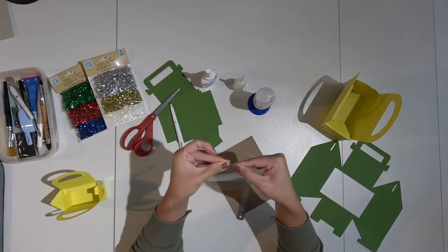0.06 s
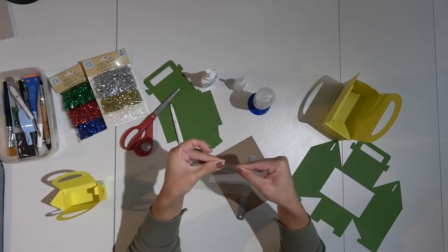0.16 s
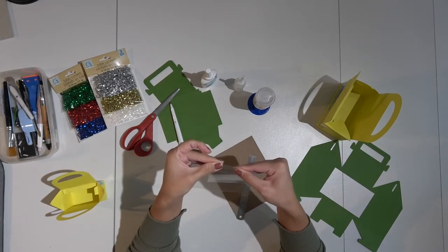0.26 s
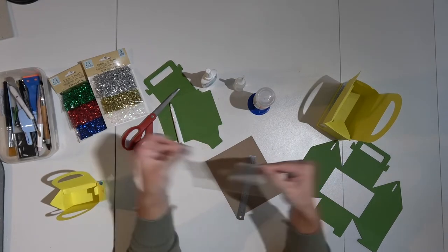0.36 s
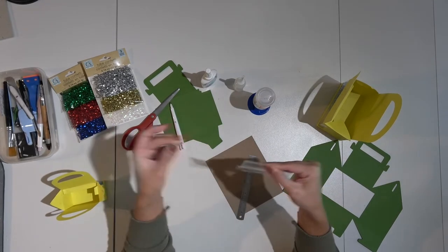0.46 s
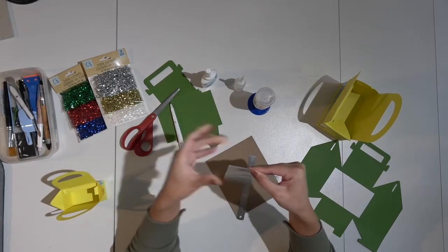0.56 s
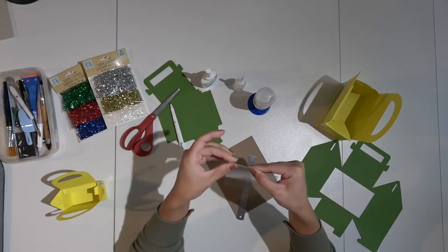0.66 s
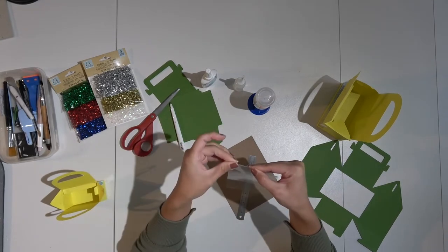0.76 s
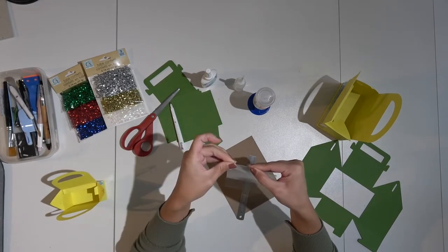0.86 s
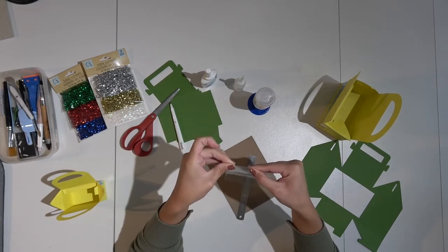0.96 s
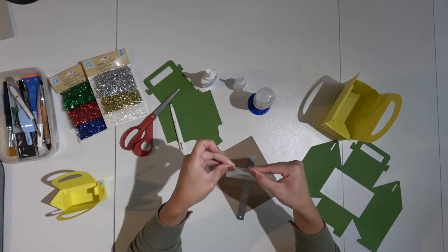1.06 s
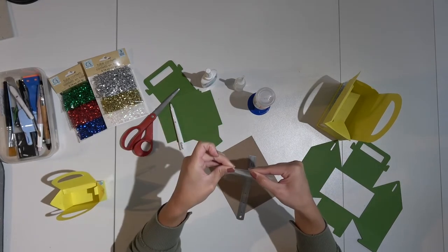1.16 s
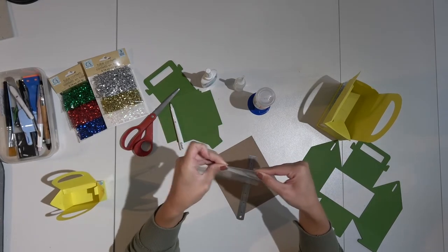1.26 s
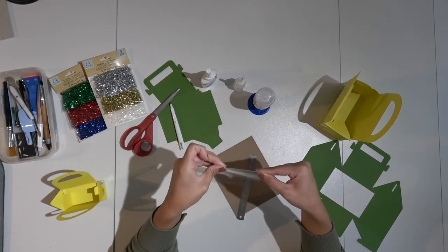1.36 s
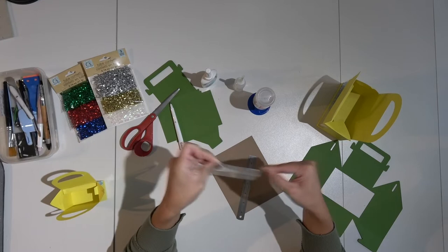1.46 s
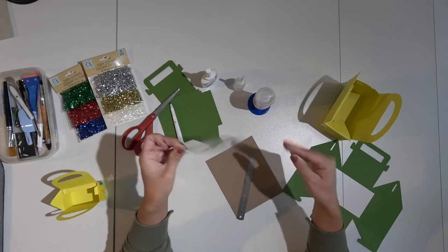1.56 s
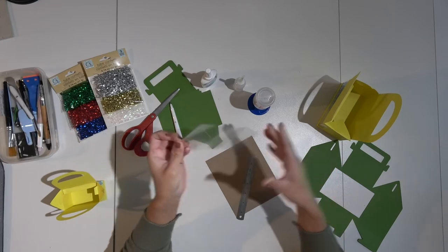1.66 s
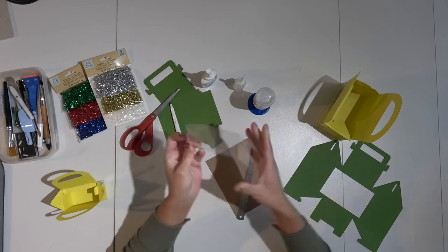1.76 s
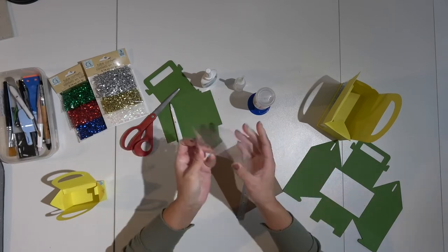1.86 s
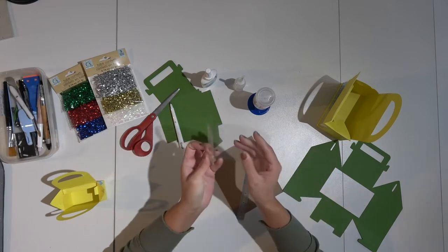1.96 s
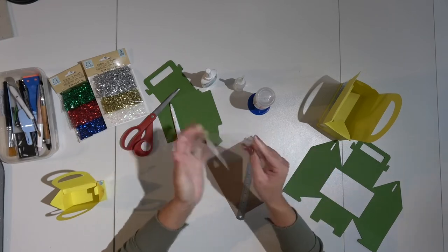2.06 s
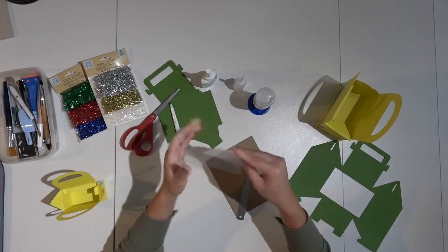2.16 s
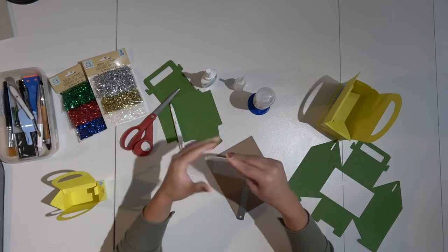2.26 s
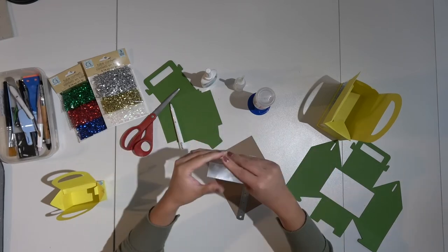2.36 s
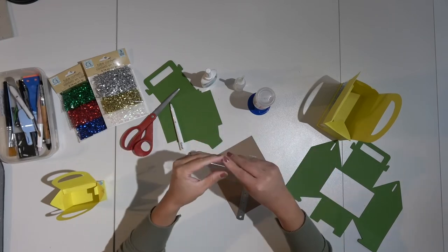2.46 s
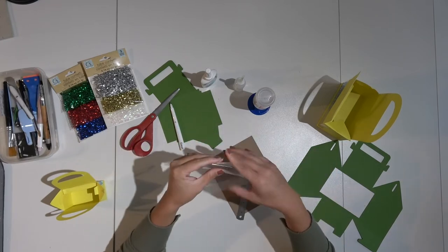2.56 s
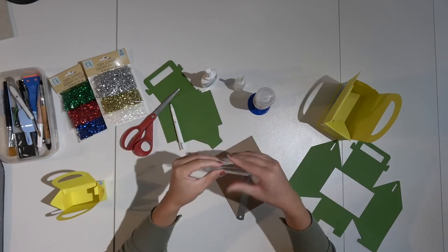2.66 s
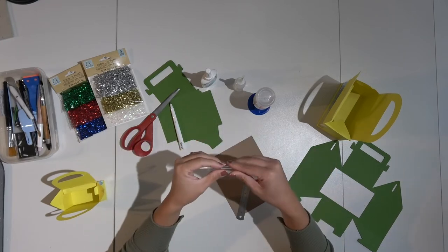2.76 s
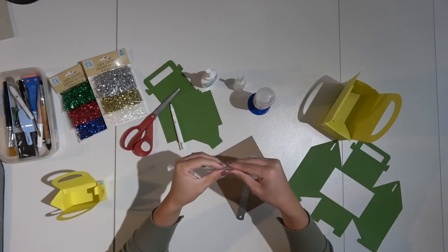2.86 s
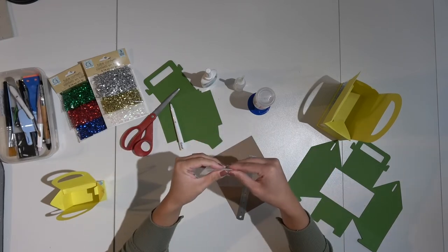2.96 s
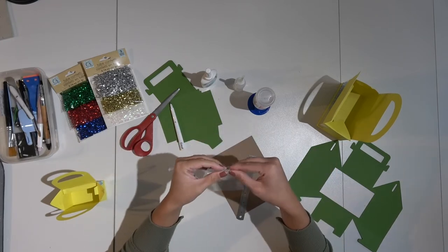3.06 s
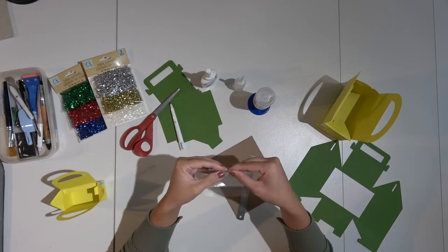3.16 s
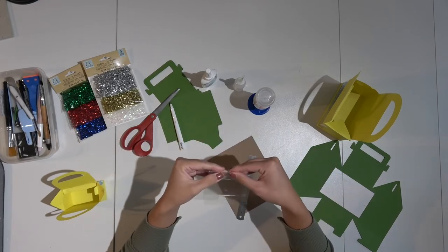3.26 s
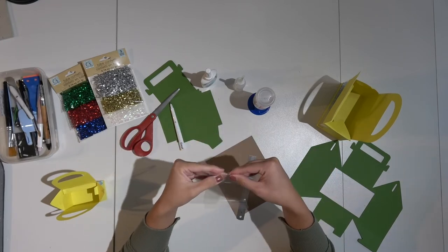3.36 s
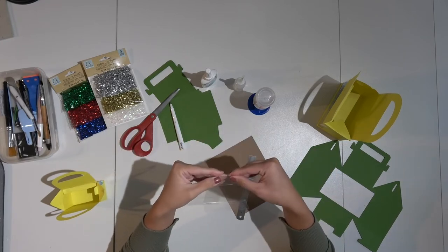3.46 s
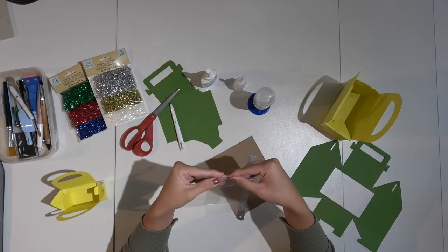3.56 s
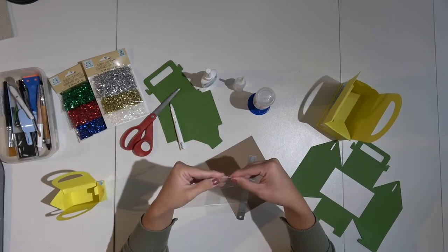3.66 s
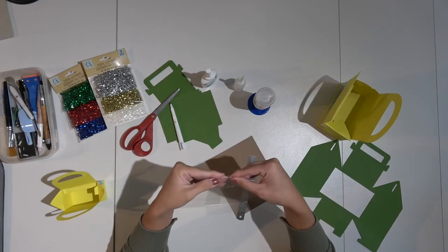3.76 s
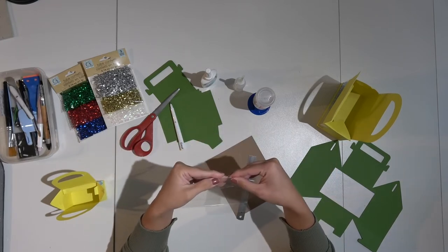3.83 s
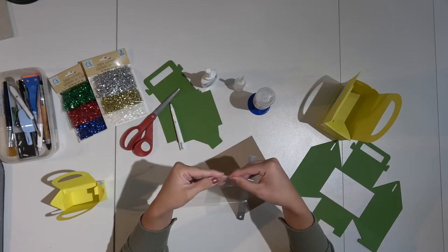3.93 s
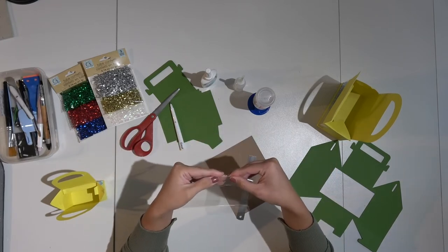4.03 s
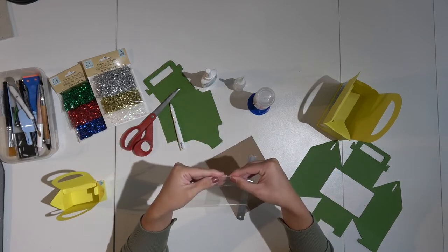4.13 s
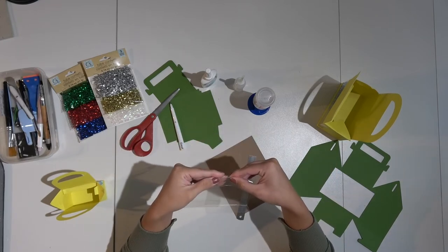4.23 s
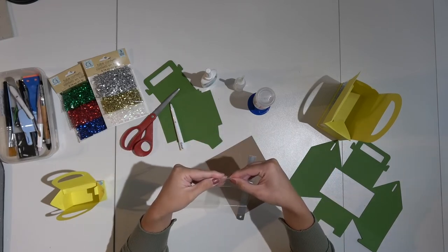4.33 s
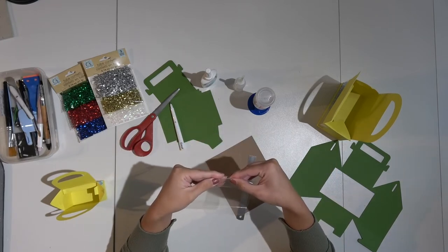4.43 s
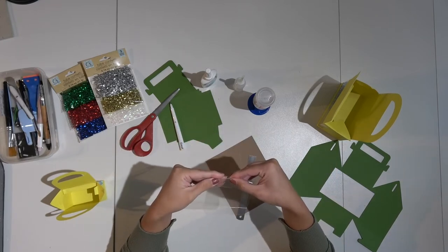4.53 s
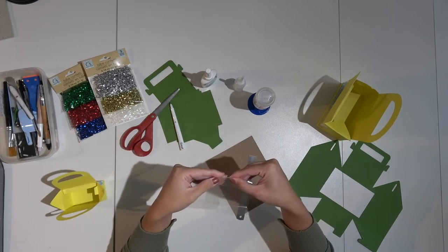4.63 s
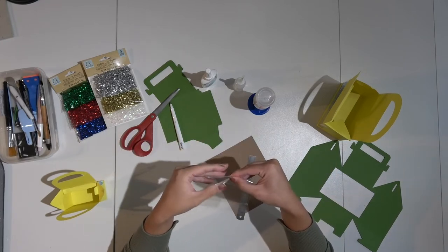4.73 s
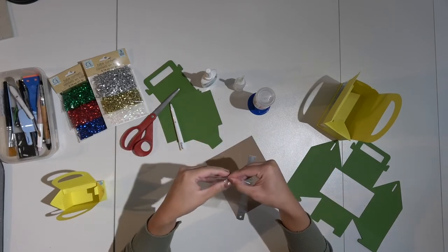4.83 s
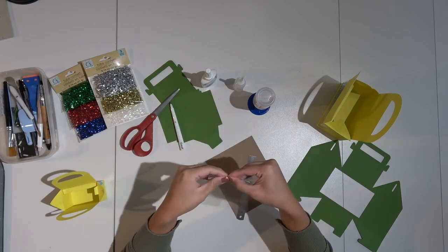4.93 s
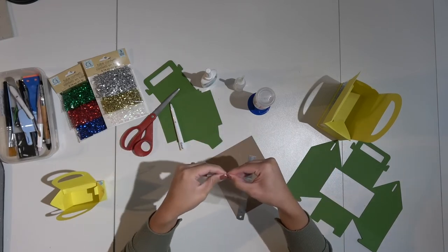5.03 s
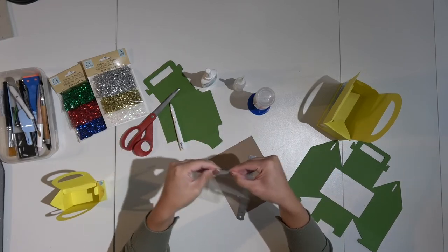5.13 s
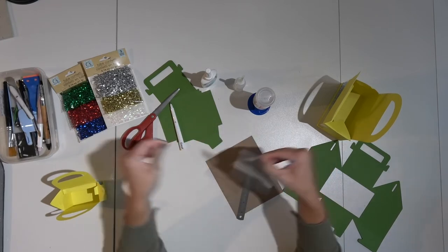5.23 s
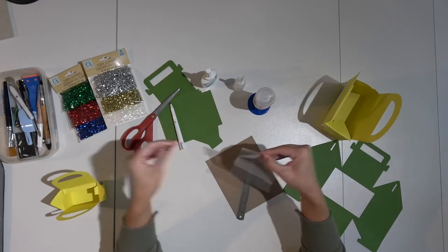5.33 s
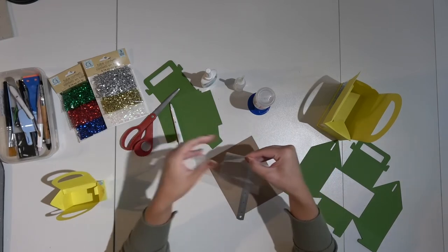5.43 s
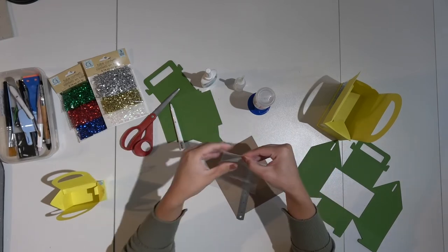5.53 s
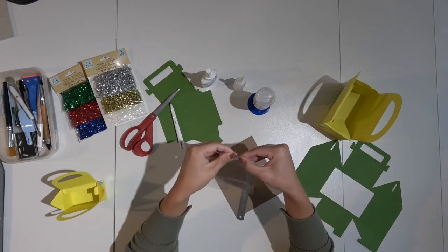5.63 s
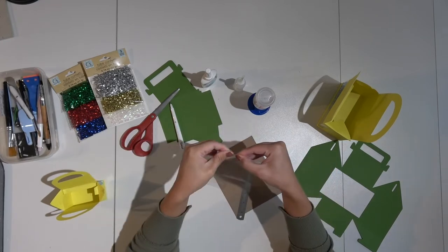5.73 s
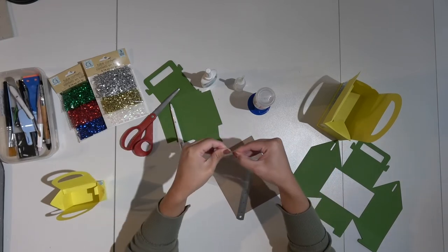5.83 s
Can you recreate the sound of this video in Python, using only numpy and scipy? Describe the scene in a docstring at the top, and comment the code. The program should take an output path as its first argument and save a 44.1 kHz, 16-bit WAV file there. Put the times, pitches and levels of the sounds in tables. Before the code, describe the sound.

A thin, stiff plastic sheet is handled in a small, lively room, with quiet fan rush, low wavering hum and fine microphone hiss throughout. After a faint rub, a bright slip and flapping flick comes at 0.3 s, with tiny ticks near 0.7 s. Dull wobbling starts at 1.1 s, a low crack with a hollow pop at 1.2 s, and a sharp flick at 1.5 s. From 1.7 to 2.1 s snaps, flutters and bright damped pops crowd together; another dense cluster follows at 2.3 to 2.6 s, then duller cracks at 2.7 to 2.9 s. Things calm to a small tick at 3.0 s and barely audible rubbing. A knocky double pop comes at 4.0 s, a crisp high snap at 4.5 s, weak flutter around 4.7 s, and a strong hissing flick with flap at 5.2 s. Soft dull wobbles and a light snap at 5.6 s finish it.

```python
"""Bending a clear plastic sheet

Two hands bend and crease a thin clear plastic sheet over a craft table in a small, live room.
Creases snap as hard kicks to many dense modes, and whole panels pop with one damped note each.
The edge slips hissing from under a fingertip and the freed sheet flaps: clouds of tiny jerks drive the modes.
Echoes and a diffuse tail surround the sheet; behind it a fan hums and rushes and the microphone hisses."""
import sys
import numpy as np
from scipy import signal
from scipy.fft import rfft, irfft, next_fast_len
from scipy.io import wavfile

SR = 44100
rng = np.random.default_rng(int(sys.argv[2]) if len(sys.argv) > 2 else 0)


def master_out(mix):
    """Clip the mix to full scale and print it as 16-bit PCM to the path in sys.argv[1]."""
    frames = np.transpose(np.atleast_2d(mix))
    ceiling = np.clip(frames, -1, 1)
    pcm = np.round(ceiling * 32767).astype(np.int16)
    wavfile.write(sys.argv[1], SR, pcm)


N = 259640  # length in samples

CUTOFF_HZ = 15800  # top of the sheet's modes and of the recorder
MID_HZ = 2300  # pitch at which levels and ring times of the sheet are stated
POP_RING_S, POP_LOW_LINGER = 0.0033, 0.76  # decay at MID_HZ; lower notes last longer by this power
# hissing strokes; the slide before each flick shares their room send
RUB_TILT_DB, RUB_CORNER_HZ, RUB_ROOM_DB = 4, 9200, -3.3


def from_db(db):
    """Decibels to gain."""
    return 10 ** (np.asarray(db) / 20)


def unit_energy(x):
    """Scale so that the squares sum to one."""
    return x / np.sqrt(np.sum(x ** 2) + 1e-30)


def at_hz(points, hz):
    """Read a table of (Hz, value) on a log-frequency axis."""
    points = np.array(points)
    return np.interp(np.log(np.maximum(hz, 1)), np.log(points[:, 0]), points[:, 1])


def add(track, sound, s):
    """Mix a sound into a track from time s on."""
    start = round(s * SR)
    first, last = max(start, 0), min(start + len(sound), N)
    track[first:last] += sound[first - start:last - start]


def sheet_modes(ring_s, low_linger, travel_s, count=110):
    """The sheet's answer to one kick: dense modes, retuned at every bend; low ones ring longer and arrive later."""
    depth = (np.arange(count) + rng.random(count))[:, None] / count
    hz = CUTOFF_HZ * (140 / CUTOFF_HZ) ** (depth * (1 + depth) / 2)
    slowness = MID_HZ / hz
    life_s = ring_s * slowness ** low_linger
    # bending waves run faster at high pitch
    arrival_s = travel_s * np.sqrt(slowness)
    t = np.maximum(np.arange(SR // 40) / SR - arrival_s, 0)
    modes = np.sin(2 * np.pi * hz * t) * np.exp(-t / life_s) / np.sqrt(life_s)
    return unit_energy(rng.choice([-1, 1], count) @ modes)


def tint(x, tilt_db, corner_hz):
    """Colour one bend: taut sheets tilt thin, slack ones full, quick moves reach higher; fine ripple stays."""
    # How well the sheet radiates. Each row: frequency in Hz, gain in dB.
    sheet_radiation = [(100, -27), (175, -20), (250, -5), (400, -4.5), (520, -2), (750, -4.5), (1150, -1),
                       (2100, -0.5), (3200, -2.5), (4100, -2), (5200, -0.5), (10000, -1.5), (13000, -6),
                       (16000, -18)]
    roll_off_order = 6.54
    size = 2 * next_fast_len(len(x) // 2 + SR // 40)
    spectrum, hz = rfft(x, size), np.fft.rfftfreq(size, 1 / SR)

    # energy in a half-octave band sliding around each frequency, stated per octave
    energy_below = np.cumsum(np.abs(spectrum) ** 2) * 2 / size
    centre, step = np.clip(hz, 170, 13000), 2 ** .25
    upper = np.interp(centre * step, hz, energy_below)
    lower = np.interp(centre / step, hz, energy_below)
    per_octave = 2 * (upper - lower)

    held = np.clip(hz, 350, 10000)  # tilt and roll-off stay constant outside this range
    roll_off_db = 10 * np.log10(1 + (held / corner_hz) ** roll_off_order)
    colour_db = tilt_db * np.log2(held / MID_HZ) - roll_off_db
    gain = from_db(colour_db + at_hz(sheet_radiation, hz)) / np.sqrt(per_octave + 1e-12)

    # folding the cepstrum makes the filter causal (minimum-phase)
    cepstrum = irfft(np.log(gain)) * (1 + np.sign(np.fft.fftfreq(size)))
    return irfft(spectrum * np.exp(rfft(cepstrum)))


def radiate(sound, s, level_db, tilt_db, corner_hz, room_db):
    """Colour one sound and place it; rows: straight to the microphone, out into the room."""
    track = np.zeros(N)
    spread_over_10_ms = np.sqrt(SR / 100)
    add(track, from_db(level_db) * spread_over_10_ms * tint(sound, tilt_db, corner_hz), s)
    return np.array([track, from_db(room_db) * track])


def stick_slip(swell_s, fade_s, per_s, spread_db, clump_db=1.5, clumps_per_s=260):
    """A cloud of tiny uneven jerks that clumps, swells and fades; also gives the time to its peak."""
    lead_s = 4 * swell_s
    t = np.arange(-lead_s, 5 * fade_s, 1 / SR)
    jerks = (rng.random(len(t)) < per_s / SR) * rng.choice([-1, 1], len(t))
    knots = np.arange(t[0], t[-1], 1 / clumps_per_s)
    grip_db = np.interp(t, knots, rng.uniform(-2.7, 2.8, len(knots))) * clump_db
    sizes = from_db(spread_db * np.minimum(rng.exponential(1, len(t)), 3) + grip_db)
    envelope = np.exp(np.where(t < 0, t / swell_s, -t / fade_s))
    return jerks * sizes * envelope, lead_s


def slip(s, swell_s, fade_s, *voice):
    """Skin sliding on plastic: fine, very dense jerks drive briefly ringing modes."""
    push, lead_s = stick_slip(swell_s, fade_s, per_s=9000, spread_db=3.5)
    modes = sheet_modes(ring_s=0.00042, low_linger=0.73, travel_s=0.000457)
    return radiate(signal.fftconvolve(push, modes), s - lead_s, *voice)


def flap(s, swell_s, fade_s, *voice):
    """The freed sheet pops through several shapes: coarser jerks, longer ringing."""
    push, lead_s = stick_slip(swell_s, fade_s, per_s=2600, spread_db=2.5)
    modes = sheet_modes(ring_s=0.00087, low_linger=0.88, travel_s=0.0004)
    return radiate(signal.fftconvolve(push, modes), s - lead_s - .001, *voice)


def releases(count=2):
    """The edge slides and flicks free; the sheet flaps and swings on, duller each time, later swings weaker."""
    # Each row: slide peak in seconds, flick peak in seconds, flick swell in seconds, flick level in dB,
    # flick corner in Hz, flap level in dB, flap tilt in dB per octave, flap corner in Hz,
    # flap fade in seconds, swing spacing in seconds, first swing level in dB.
    release_rows = [(0.319, 0.336, .008, -39, 9100, -33, 1.5, 4130, 0.017, 0.048, -39.5),
                    (1.453, 1.4798, 0.007, -35.5, 7250, -27.5, 3.5, 5100, 0.0071, 0.04, -35),
                    (1.853, 1.9027, 0.0019, -45.5, 7500, -31.5, 3, 3200, .02, 0.029, -40.5),
                    (1.976, 2.0043, 0.0012, -46, 5300, -25.5, 5, 2800, 0.012, .012, -27),
                    (2.414, 2.4374, 0.0014, -34.5, 5160, -34, 4, 5050, .004, .02, -55),
                    (2.523, 2.541, .0055, -39.5, 8300, -38.5, 2.5, 5100, 0.0028, .032, -32.5),
                    (4.651, 4.6735, 0.00082, -46, 8600, -46, -1, 3020, 0.014, .014, -47),
                    (5.1045, 5.1828, .006, -34, 9500, -32, 1.04, 3470, 0.006, 0.016, -41)]
    slide_db, slide_tilt_db, slide_corner_hz = -52, 2.5, 9350
    slide_swell_s, slide_fade_share = 0.0033, .8  # fade as a share of the time left until the flick
    flick_fade_s, flick_tilt_db, flick_room_db = 0.0028, 6, -7.5
    flap_delay_s, flap_swell_s, flap_room_db = .0055, .002, -0.44
    swing_rise_s, swing_fade_s, swing_room_db = .005, 0.013, -5.5
    swing_tilt_loss_db = 1.2  # against the flap
    swing_loss_db, swing_dulling = 10, 0.71  # level loss and corner factor from swing to swing
    out = 0
    for (slide_s, s, swell_s, flick_db, flick_hz, flap_db, tilt_db, flap_hz,
         fade_s, swing_s, swing_db) in release_rows:
        free_s = s + flap_delay_s
        slide_fade_s = slide_fade_share * (s - slide_s)
        out = out + slip(slide_s, slide_swell_s, slide_fade_s,
                         slide_db, slide_tilt_db, slide_corner_hz, RUB_ROOM_DB)
        out = out + slip(s, swell_s, flick_fade_s, flick_db, flick_tilt_db, flick_hz, flick_room_db)
        out = out + flap(free_s, flap_swell_s, fade_s, flap_db, tilt_db, flap_hz, flap_room_db)
        for k in range(count):
            out = out + flap(free_s + (k + 1) * swing_s, swing_rise_s, swing_fade_s,
                             swing_db - k * swing_loss_db, tilt_db - swing_tilt_loss_db,
                             flap_hz * swing_dulling ** (k + 1), swing_room_db)
    return out


def buckle(run_s, jerk_db, count=4):
    """A unit kick and small random followers as the buckle runs along the crease."""
    push = np.zeros(SR // 100)
    delays = np.minimum(rng.exponential(run_s * SR, count).astype(int), len(push) - 1)
    push[delays] = from_db(jerk_db) * rng.standard_normal(count)
    push[0] = 1
    return push


def snaps():
    """Each crease buckle is one hard kick to the modes, with a few small jerks after it."""
    # Each row: start in seconds, level in dB, tilt in dB per octave, corner in Hz.
    snap_rows = [(0.0264, -68, 7, 12000), (0.6602, -54.5, -1, 6000), (0.6772, -55, 4, 6500),
                 (1.2242, -33, 5, 1400), (1.7304, -45, 0.5, 1770), (1.7888, -56, 3, 12000),
                 (1.9115, -39.5, 3, 4730), (1.9784, -42, -2, 9000), (2.05, -42.5, -0.5, 5900),
                 (2.2273, -57, 3, 8000), (2.327, -54.5, 5.5, 8000), (2.375, -30.5, 5.5, 2800),
                 (2.386, -49, 4, 2000), (2.6934, -31, 6, 1920), (2.7541, -50.5, 3, 6000),
                 (2.8106, -40.5, 0, 2050), (2.8823, -41, 5.5, 2300), (3.0396, -49.5, -0.5, 4200),
                 (3.364, -66.5, 0.5, 7000), (3.9973, -40, 3.5, 2670), (4.0367, -46.5, -1, 1710),
                 (4.4617, -35.5, 5, 4260), (4.6556, -53.5, -2.5, 9000), (4.855, -53, 1, 12000),
                 (5.6066, -43, 4, 6140)]
    ring_s, room_db = 0.0025, -1.5
    out = 0
    for s, *voice in snap_rows:
        push = buckle(run_s=.002, jerk_db=-7)
        sound = signal.fftconvolve(push, sheet_modes(ring_s, low_linger=0.57, travel_s=0.00047))
        direct, _ = radiate(sound, s, *voice, room_db)
        # over all directions the modes' ripple evens out, so the room gets the push without modes
        _, scattered = radiate(push, s, *voice, room_db)
        out = out + np.array([direct, scattered])
    return out


def pops(room_db=-6):
    """A whole panel pops through and rings with one damped mode; rows as in radiate."""
    # Each row: start in seconds, note in Hz, starting level of the decay in dB.
    pop_rows = [(1.2243, 912, -31), (1.9112, 2450, -21), (2.019, 2890, -19), (2.3769, 1916, -24.5),
                (2.4406, 1180, -22), (2.542, 1294, -28.5), (3.998, 2040, -32.5), (4.0375, 501, -35.5),
                (4.4617, 5570, -24), (4.4636, 2670, -32)]
    t, track = np.arange(SR // 20) / SR, np.zeros(N)
    for s, hz, peak_db in pop_rows:
        ring_s = POP_RING_S * (MID_HZ / hz) ** POP_LOW_LINGER
        note = np.sin(2 * np.pi * hz * t) * np.exp(-t / ring_s)
        add(track, from_db(peak_db) * note, s)
    return np.array([track, from_db(room_db) * track])


def rubs():
    """A fingertip rubs along the fold in light, hissing strokes of stick and slip."""
    # Each row: peak time in seconds, swell in seconds, fade in seconds, level in dB.
    rub_rows = [(0.0803, 0.0092, 0.049, -52.5), (1.25, .014, 0.039, -46.5), (1.8549, .0015, .008, -52),
                (3.169, 0.046, .048, -60.5), (3.46, 0.026, .03, -67), (4.924, .015, 0.0057, -57.5),
                (5.169, .025, 0.0055, -50)]
    return sum(slip(*row, RUB_TILT_DB, RUB_CORNER_HZ, RUB_ROOM_DB) for row in rub_rows)


def wobbles():
    """The slack sheet flaps dully as the hands shift their grip."""
    # Each row: peak time in seconds, swell in seconds, fade in seconds, level in dB, corner in Hz.
    wobble_rows = [(0.007, .013, 0.022, -53, 1920), (1.121, 0.0073, 0.014, -41.5, 2460),
                   (1.162, 0.0033, 0.095, -45, 1520), (1.584, .011, 0.012, -40.5, 2780),
                   (1.748, .0235, 0.084, -45.5, 2140), (2.308, 0.00098, 0.037, -45, 2560),
                   (2.361, 0.0075, 0.0098, -39, 3070), (4.045, .004, 0.0077, -44, 900),
                   (4.729, .0075, 0.013, -43.5, 1300), (4.882, 0.0081, .017, -44.5, 1040),
                   (5.106, .004, 0.045, -42, 696), (5.344, 0.017, 0.011, -45, 1130),
                   (5.469, .021, .013, -44.5, 1010), (5.613, .006, 0.02, -45.5, 2190)]
    tilt_db, room_db = 0.08, -1
    return sum(flap(s, swell_s, fade_s, level_db, tilt_db, corner_hz, room_db)
               for s, swell_s, fade_s, level_db, corner_hz in wobble_rows)


def room_tail(build_s=0.0075, count=13):
    """Diffuse reflections: flat noise whose bands build up together and each die at their own rate."""
    # Each row: frequency in Hz, reverberation time in seconds.
    reverb_times = [(200, 0.85), (530, 0.47), (1400, 0.38), (3700, 0.37), (9700, 0.47), (15000, 0.12)]
    t = np.arange(SR // 2) / SR
    hz, white = np.fft.rfftfreq(len(t), 1 / SR), rfft(rng.standard_normal(len(t)))
    edges, out = np.geomspace(100, SR / 2, count), 0
    build_up = 1 - np.exp(-(t / build_s) ** 2)
    for low, high in zip(edges, edges[1:]):
        band = irfft(white * ((hz >= low) & (hz < high)), len(t))
        decay = np.exp(-np.log(1000) * t / at_hz(reverb_times, np.sqrt(low * high)))
        out = out + unit_energy(band * decay * build_up) * np.sqrt(high - low)
    return unit_energy(out)


def room(x, side_db=-15):
    """A few clear echoes and the tail; the two close capsules hear almost the same."""
    # First reflections from table and walls. Each row: delay in seconds, level in dB against the diffuse tail.
    echo_rows = [(.0032, -29), (.009, -10.5), (0.0208, -11)]
    mid = room_tail()
    for delay_s, echo_db in echo_rows:
        mid[round(delay_s * SR)] += from_db(echo_db)
    mid = unit_energy(mid)
    side = from_db(side_db) * room_tail()
    return np.array([signal.fftconvolve(x, mid + sign * side)[:N] for sign in (1, -1)])


def hum(waver=0.72, count=30):
    """Fan tones that waver slowly in strength and phase."""
    # Each row: frequency in Hz, level in dB rms.
    hum_tones = [(59, -70.5), (88, -70), (158, -77), (245, -73.5), (263, -80.5), (500, -71.5)]
    t, out = np.arange(N) / SR, 0
    for hz, level_db in hum_tones:
        knots = 1 + waver * (rng.standard_normal(count) + 1j * rng.standard_normal(count))
        sway = np.interp(t, np.linspace(0, t[-1], count), knots)
        tone = np.real(sway * np.exp(2j * np.pi * hz * t))
        out = out + from_db(level_db) * unit_energy(tone)
    return np.sqrt(N) * out


def steady_noise(spectrum, side_db):
    """Stereo noise of a given colour: a mid signal of rms 1 and a weaker side signal."""
    gain = from_db(at_hz(spectrum, np.fft.rfftfreq(N, 1 / SR)))
    mid, side = [unit_energy(irfft(rfft(rng.standard_normal(N)) * gain, N)) for _ in range(2)]
    return np.sqrt(N) * (mid + from_db(side_db) * side * np.array([[1], [-1]]))


def fan(level_db=-59.5):
    """Air rush as coloured noise, plus the wavering hum with a weak stereo side."""
    # Each row: frequency in Hz, relative density in dB per Hz.
    rush_colour = [(25, -6), (60, -2.5), (115, 1.5), (190, -9.5), (270, -5), (350, -4), (620, -11),
                   (830, -3.5), (1080, -9), (1280, -3), (1420, -13.5), (2200, -21), (5000, -24)]
    tones = hum() + from_db(-15) * hum() * np.array([[1], [-1]])
    return from_db(level_db) * steady_noise(rush_colour, side_db=-14) + tones


def microphone_hiss(level_db=-69):
    """The microphone's own steady noise, bright at the top."""
    # Each row: frequency in Hz, relative density in dB per Hz.
    hiss_colour = [(500, 0.5), (3000, 0.5), (6300, 4), (10400, -3), (11200, 11), (12000, 3), (15500, -7.5)]
    return from_db(level_db) * steady_noise(hiss_colour, side_db=-18)


def scene(left_db=0.48):
    """Sheet, room and fan lean just left of centre; the microphone hiss stays centred."""
    direct, scattered = releases() + snaps() + pops() + rubs() + wobbles()
    balance = from_db([[left_db], [-left_db]])
    return (direct + room(scattered) + fan()) * balance + microphone_hiss()


def record(dry):
    """The recorder cuts the top steeply with an elliptic low-pass."""
    return signal.sosfilt(signal.ellip(12, .1, 90, CUTOFF_HZ, fs=SR, output="sos"), dry)


dry = scene()
out = record(dry)
master_out(out)
```